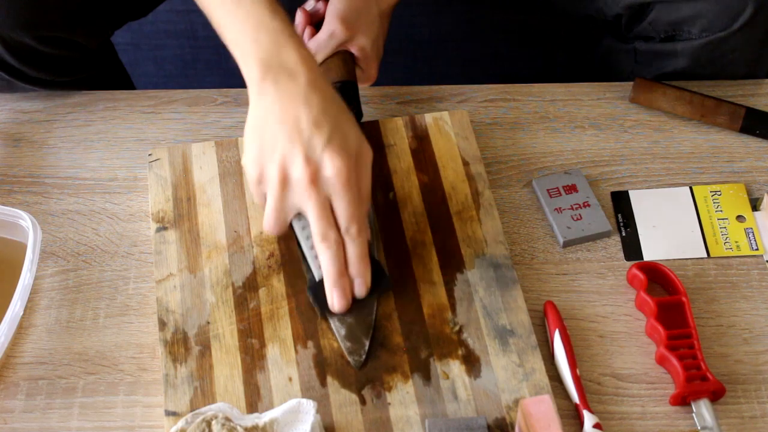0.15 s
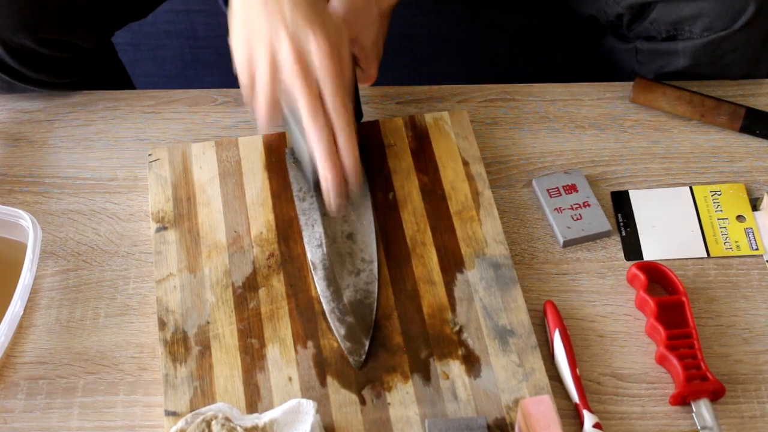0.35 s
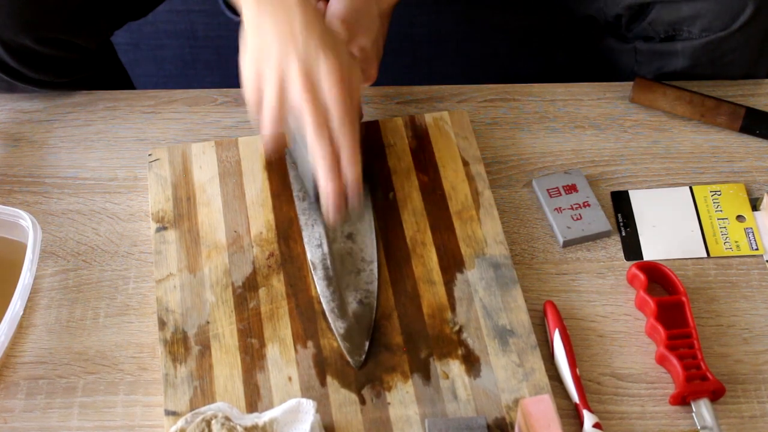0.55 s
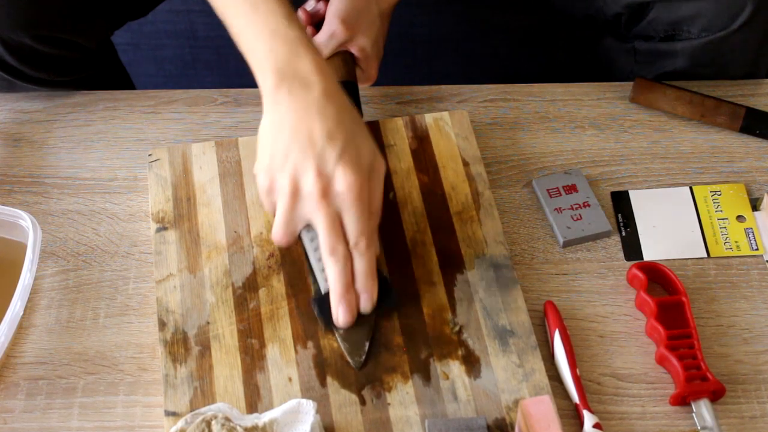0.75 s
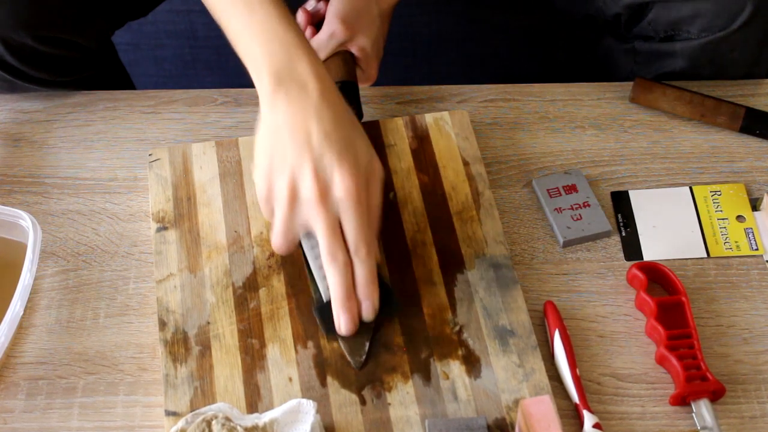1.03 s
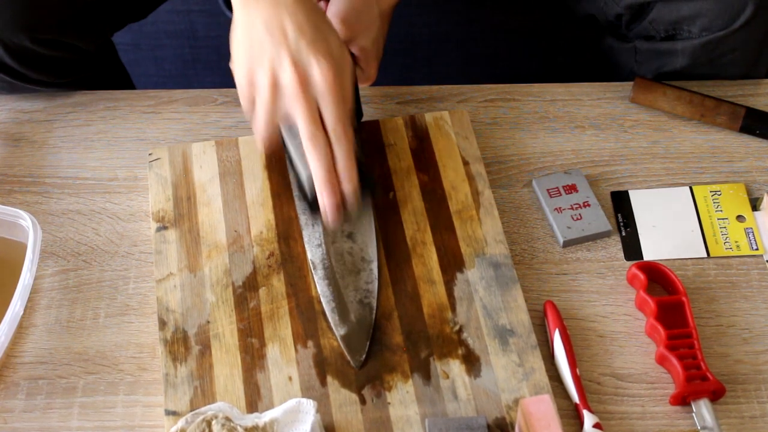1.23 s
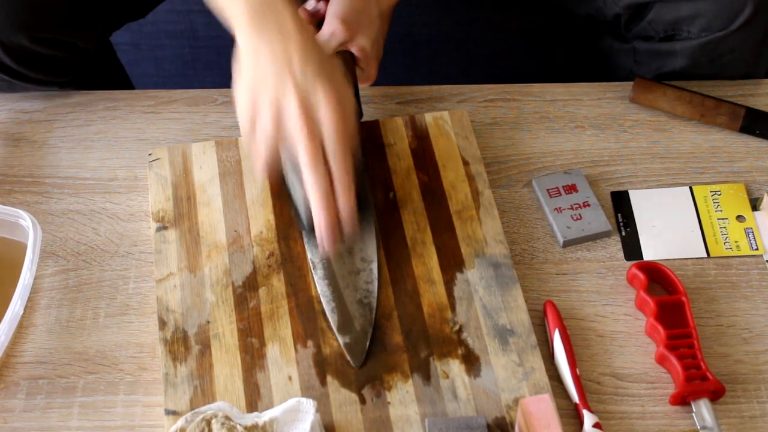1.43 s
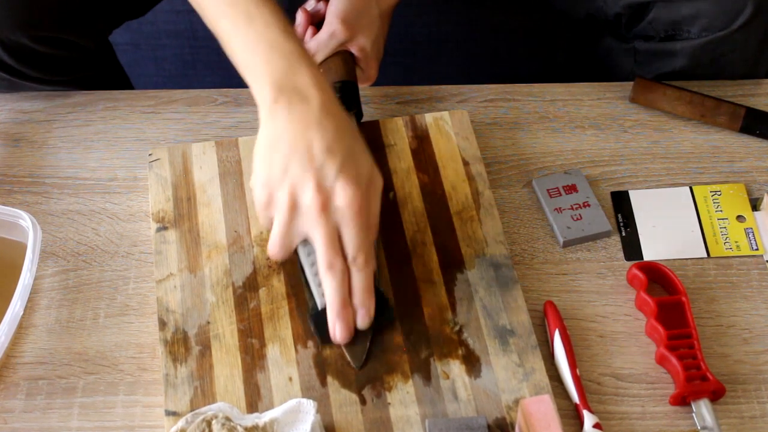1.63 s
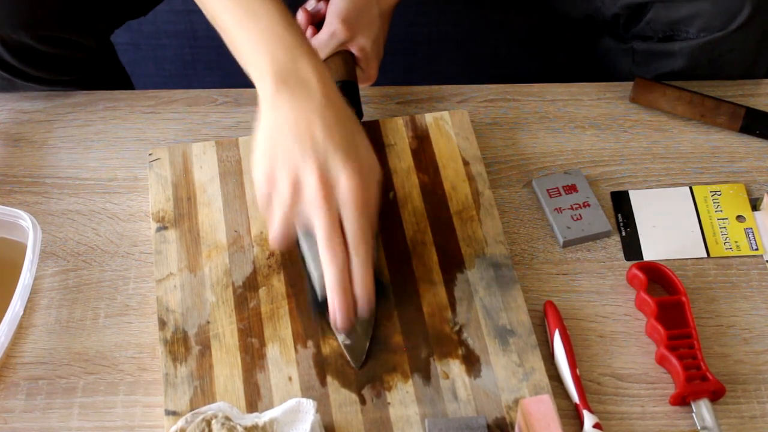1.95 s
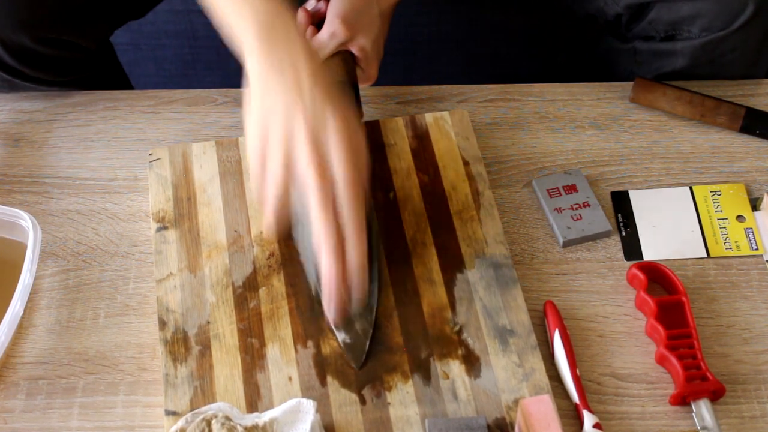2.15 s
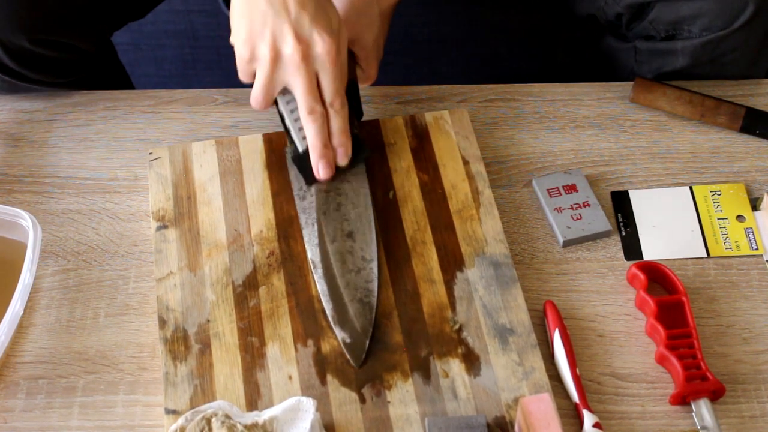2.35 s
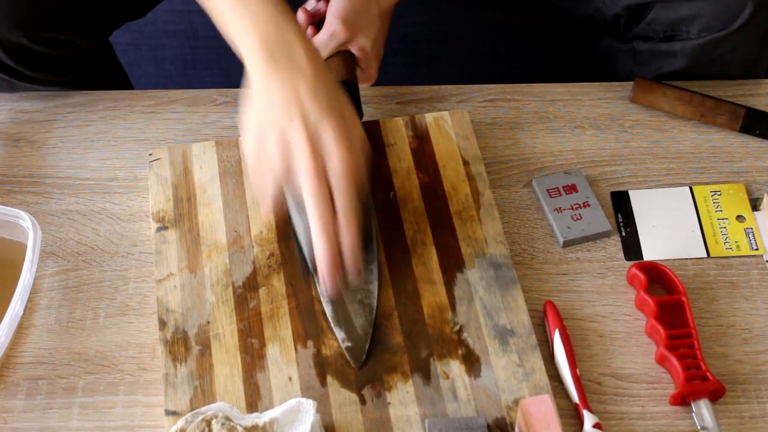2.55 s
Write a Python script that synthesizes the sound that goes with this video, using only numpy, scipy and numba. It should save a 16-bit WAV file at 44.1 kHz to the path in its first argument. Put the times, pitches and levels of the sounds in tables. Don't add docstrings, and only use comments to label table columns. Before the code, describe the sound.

Sandpaper rubs a rusty steel blade in quick, steady back-and-forth strokes, a harsh bright rasp swelling and dipping with each stroke, while the wooden board softly thuds on the table; close microphone, small quiet room.

```python
import sys
import numpy as np
from scipy import signal
from scipy.fft import rfft, irfft
from scipy.io import wavfile
from scipy.ndimage import uniform_filter1d
from numba import njit

SR = 44100
rng = np.random.default_rng(int(sys.argv[2]) if len(sys.argv) > 2 else 0)


def boost(x):
    u = np.asarray(x, float) / 20
    return 10 ** u


def put_to_file(sound):
    columns = np.atleast_2d(sound).T
    safe = np.clip(columns, -1, 1)
    whole_steps = np.round(safe * 32767)
    wavfile.write(sys.argv[1], SR, whole_steps.astype(np.int16))


N = 119070

# [t/s, pressure/dB, brightness/dB, swell over the stroke/dB, mid-stroke rasp/dB]
HAND_TURNS = [(-.075, 0, 1, -5, 0.5), (.073, 1, -0.5, 2.5, 5), (0.219, -1.2, 1, 1, -1.5),
              (0.371, 0.5, 0, 0.5, 6), (0.529, -2, 1.5, 0.5, -1), (.674, 0.25, 0.7, 2.7, 3.5),
              (0.822, .3, 1.56, 0, -4), (.97, 1, 0.44, 1, 6.5), (1.128, 0.2, -.6, -1.5, 0.5),
              (1.269, 1.5, -.5, 1.5, 3), (1.408, -1, 0, -2, 1), (1.563, 2, -1.5, -1, 4),
              (1.701, 0, 0, 0.5, -2), (1.853, 2, -0.5, -0.5, 3.5), (1.997, -0.5, -0.5, -0.5, 0.5),
              (2.136, 1, -0.5, -0.3, 4), (2.276, -1, 0.5, 1, 1), (2.422, 1.5, 0.5, -2, 4),
              (2.565, -0.06, 0, 1.5, 0.5), (2.702, 0, 0, -13, 0)]
# [f/Hz, width/Hz, level/dB, change from heel to tip/dB, push over pull/dB]
BLADE_TONES = [(1354, 980, -15.5, 7, -2), (1750, 410, -24, 14, 11), (1908, 160, -2, -2.5, -1.5),
               (2430, 410, -3.5, 3, 0), (3103, 495, 0, -4, -0.5), (3573, 486, -0.5, 4, -0.5),
               (4040, 380, -1.5, 2, -0.5), (4920, 740, -5, 2, -1), (5770, 730, -8, 8, 0),
               (6856, 1240, -6, -3, -0.5), (7840, 1740, -5, -4, -3), (9690, 3700, -10, -3.5, -0.5),
               (12380, 3500, -11, -7.5, 0.5), (14800, 2400, -11.5, -7, 2)]
# [t/s, knock level/dB, upper tones level/dB, bounce level/dB]
BOARD_THUDS = [(.075, -22, -26.5, -23), (.13, -26.5, -30.5, -36.5), (0.22, -34, -34, -35.5),
               (0.381, -19, -22, -21), (0.429, -39, -27, -31), (0.532, -31, -31, -41),
               (.679, -26, -29.5, -41), (0.978, -26.5, -19.5, -20.5), (1.034, -33.5, -33, -41),
               (1.056, -33, -43, -59), (1.272, -25, -37, -46), (1.561, -30, -25, -37),
               (1.633, -30, -38, -43), (1.693, -35, -28.5, -37), (1.857, -27, -26, -35),
               (1.927, -29, -35, -43), (2.139, -52, -23, -23.5), (2.209, -32, -29.5, -39),
               (2.422, -24.5, -31, -47), (2.495, -28, -36, -42), (.303, -33, -46, -41),
               (.486, -33, -42, -43), (0.593, -32, -48, -42), (.76, -34, -32, -38), (1.127, -35, -38, -35),
               (1.366, -42, -35, -47), (1.415, -31, -40, -47), (2.386, -44, -36, -49),
               (2.602, -31.5, -37, -48), (2.669, -35, -39, -43)]
# [f/Hz, time to fade by 60 dB/s, level/dB]
BOARD_TONES = [(67.6, 0.17, -27), (117, 0.09, -40), (138, 0.089, 2), (204, 0.061, -8), (292, 0.062, -4.5),
               (336.8, 0.13, -8.5), (449, 0.11, -9.5)]
# [f/Hz, level per Hz/dB]
ROOM_COLOUR = [(12, -20), (25, 10), (45, -8), (75, 4), (250, 0), (600, -13), (1200, -6.5), (2500, -37)]

CREEP = 0.38
STICK = 0.027
BITE = 3.56
SHARP_PUSH_HEEL, SHARP_PULL_HEEL, SHARP_TIP = 1.1, 0.75, 1.2

GRIT_PER_S, GRIT_SPREAD_DB, GRIT_TOP_DB = 10860, 3, 16
SHARED_GRIT = 0.73
SCRUB_DB = -20.5
BODY_TONE = (530, 460, -19, 0, 0)
GRIP_POWER, SPEED_POWER_PER_OCTAVE = 0.87, 0.42
PATCH_DB, FLICKER_DB = 0.8, 1.1
PITCH_DRIFT, TIP_SHIFT = 0.025, 0.017
RASP_HZ, RASP_OCTAVES = 6660, 0.61
EDGE_HZ = 1670

THUD_PUSH_S, BOUNCE_S = 0.002, 0.01383
UPPER_HZ = 190
MIC_LOW_HZ = 97
SHAKE_DB, SHAKE_WANDER_DB = -44.5, 1.5

ECHO_T60_S, ECHO_DB = 0.3, -19
ROOM_DB = -46.5


def level(x, db):
    return x * boost(db) / np.sqrt(np.mean(x ** 2))


def walk(rate):
    hold = int(SR / rate)
    steps = np.repeat(rng.standard_normal(N // hold + 1), hold)
    smooth = uniform_filter1d(uniform_filter1d(steps, hold), hold)
    return 1.71 * smooth[:N]


@njit
def moving_resonance(x, hz, width):
    y, band, low = np.empty(len(x)), 0., 0.
    for i in range(len(x)):
        g, damping = np.tan(np.pi * hz[i] / SR), width / hz[i]
        v = (band + g * (x[i] - low)) / (1 + g * (g + damping))
        band = 2 * v - band
        low = low + 2 * g * v
        y[i] = damping * v
    return y


def hand():
    t, turns = np.arange(N) / SR, np.array(HAND_TURNS)
    count = np.interp(t, turns[:, 0], np.arange(len(turns)))
    stroke, progress = count.astype(int), count % 1
    push = stroke % 2
    place = np.where(push, progress, 1 - progress)
    moved = np.clip((place - STICK) / (1 - STICK), 0, 1)
    sharp_heel = np.where(push, SHARP_PUSH_HEEL, SHARP_PULL_HEEL)
    sharpness = sharp_heel * (1 - place) + SHARP_TIP * place
    arch = np.abs(np.sin(np.pi * moved)) ** sharpness
    speed = CREEP + (1 - CREEP) * arch
    grip = CREEP + (1 - CREEP) * np.tanh(BITE * arch) / np.tanh(BITE)
    press_db = turns[stroke, 1] + turns[stroke, 3] * (2 * progress - 1)
    bright_db = turns[stroke, 2]
    rasp_db = turns[stroke, 4] * arch ** 2
    smooth_push = uniform_filter1d(1. * push, size=400)
    return speed, grip, place, smooth_push, press_db, bright_db, rasp_db


def grit():
    chance = rng.random((3, N))
    size_db = np.minimum(-GRIT_SPREAD_DB * np.log(chance[1] + 1e-9), GRIT_TOP_DB)
    size = boost(size_db) * np.sign(chance[2] - .5)
    catch = np.clip((GRIT_PER_S / SR - chance[0]) * 50, 0, 1)
    return level(catch * size, 0)


def scrub(speed, grip, place, push, press_db, bright_db, rasp_db):
    common, patch_db, out = grit(), PATCH_DB * walk(60), 0
    edge = signal.butter(4, EDGE_HZ, "high", fs=SR, output="sos")
    for k, (hz, width, db, tip_db, push_db) in enumerate(BLADE_TONES + [BODY_TONE]):
        octave = np.log2(hz / 3000)
        shift = PITCH_DRIFT * walk(18) + TIP_SHIFT * (place - .5)
        centre = hz * (1 + shift * min(4000 / hz, 1))

        rub = (-1) ** k * SHARED_GRIT * common + np.sqrt(1 - SHARED_GRIT ** 2) * grit()
        rub = rub * grip ** (GRIP_POWER * min(hz / 2200, 1))
        rub = rub * speed ** max(SPEED_POWER_PER_OCTAVE * octave, 0)

        gain_db = db + tip_db * (place - .5) + push_db * push
        gain_db = gain_db + press_db + bright_db * max(octave, 0) + patch_db
        gain_db = gain_db + rasp_db * np.exp(-(np.log2(hz / RASP_HZ) / RASP_OCTAVES) ** 2)
        gain_db = gain_db + FLICKER_DB * min(5000 / hz, 1) * walk(39.79)

        ring = moving_resonance(rub * boost(gain_db), centre, 1.62 * width)
        ring = moving_resonance(ring, centre, 1.62 * width)
        out = out + (signal.sosfilt(edge, ring) if hz > 1800 else ring)
    return level(out, SCRUB_DB)


def thud_push(start):
    t = np.arange(N) / SR
    shape = np.sin(np.pi * np.clip((t - start) / THUD_PUSH_S, 0, 1)) ** 2
    return shape * 2 / (THUD_PUSH_S * SR)


def board_tone(x, hz, t60):
    pole = np.exp((2j * np.pi * hz - np.log(1000) / t60) / SR)
    return signal.lfilter([1], [1, -pole], x).imag


def board(speed):
    low, upper = 0, 0
    for start, knock_db, upper_db, bounce_db in BOARD_THUDS:
        low = low + boost(knock_db) * thud_push(start) + boost(bounce_db) * thud_push(start + BOUNCE_S)
        upper = upper + boost(upper_db) * thud_push(start)
    shake = rng.standard_normal(N) * np.sqrt(speed) * boost(SHAKE_WANDER_DB * walk(16))

    knocks, shaken = 0, 0
    for hz, t60, db in BOARD_TONES:
        knocks = knocks + boost(db) * board_tone(low if hz < UPPER_HZ else upper, hz, t60)
        shaken = shaken + boost(db - 9.9 * (hz > UPPER_HZ)) * board_tone(shake, hz, 2.16 * t60)
    knocks = signal.sosfilt(signal.butter(3, MIC_LOW_HZ, "high", fs=SR, output="sos"), knocks)
    return knocks + level(shaken, SHAKE_DB)


def echo(x):
    t = np.arange(SR // 2) / SR
    tail = rng.standard_normal(len(t)) * boost(-60 * t / ECHO_T60_S) * (t > .004)
    tail = signal.lfilter([.6], [1, -.4], tail)
    tail = tail / np.sqrt(np.sum(tail ** 2))
    return signal.fftconvolve(x, tail)[:N] * boost(ECHO_DB)


def room():
    hz, table = np.maximum(np.arange(N // 2 + 1) * SR / N, 1), np.array(ROOM_COLOUR)
    colour = boost(np.interp(np.log(hz), np.log(table[:, 0]), table[:, 1], right=-70))
    rumble = irfft(rfft(rng.standard_normal(N)) * colour, N)
    return level(rumble, ROOM_DB)


def scene():
    motion = hand()
    speed = motion[0]
    rub = scrub(*motion)
    grip = motion[1]
    return (rub + echo(rub) + board(grip) + room())[None]


def low_pass(x):
    return signal.sosfilt(signal.butter(12, 15700, fs=SR, output="sos"), x)


def record(dry):
    mix = signal.sosfilt(signal.butter(2, 32, "high", fs=SR, output="sos"), dry)
    return low_pass(mix)


dry = scene()
out = record(dry)
put_to_file(out)
```